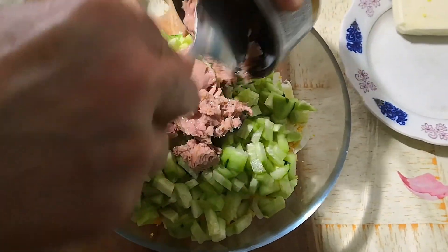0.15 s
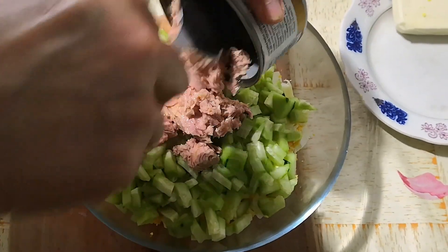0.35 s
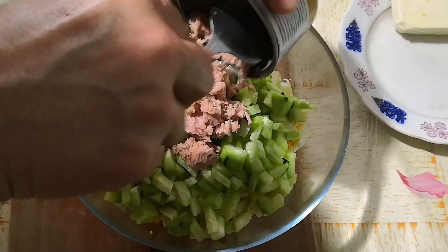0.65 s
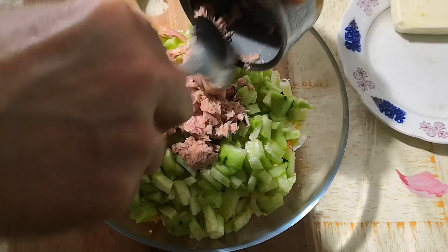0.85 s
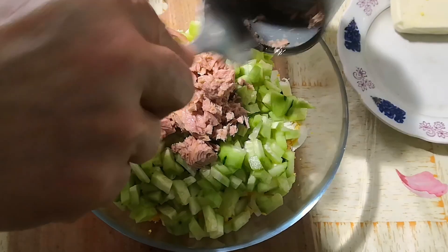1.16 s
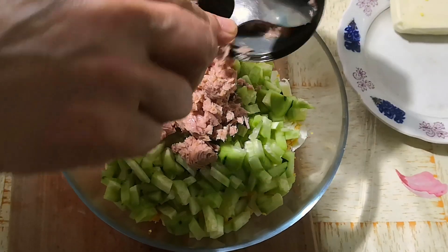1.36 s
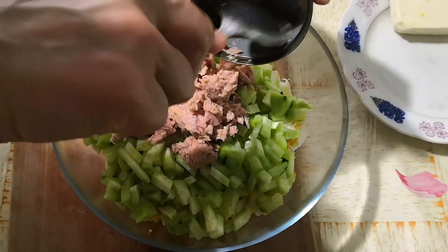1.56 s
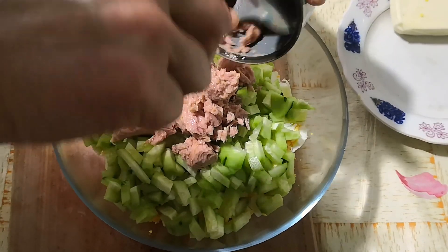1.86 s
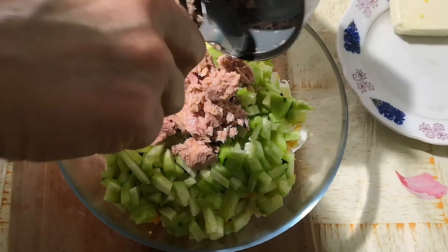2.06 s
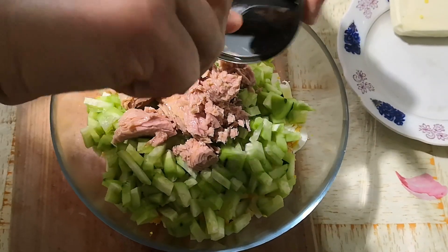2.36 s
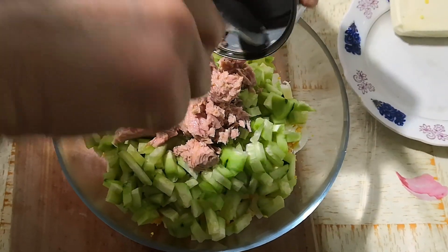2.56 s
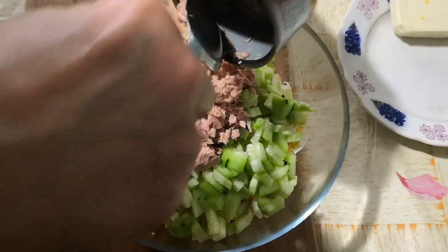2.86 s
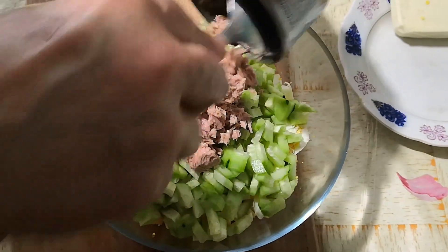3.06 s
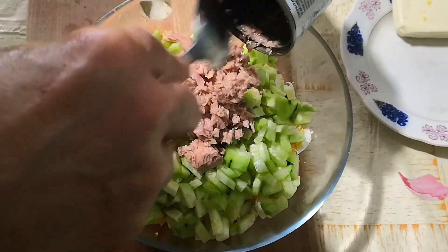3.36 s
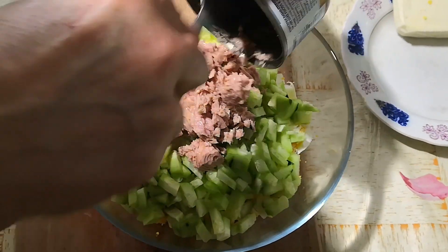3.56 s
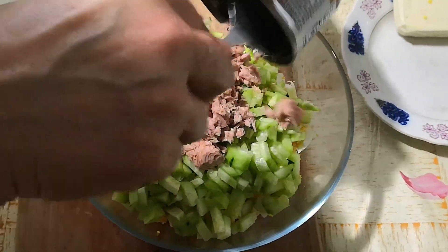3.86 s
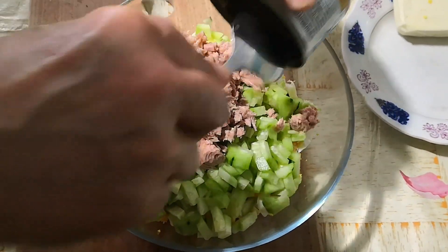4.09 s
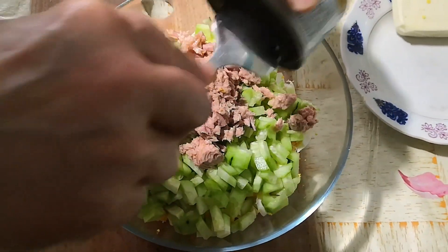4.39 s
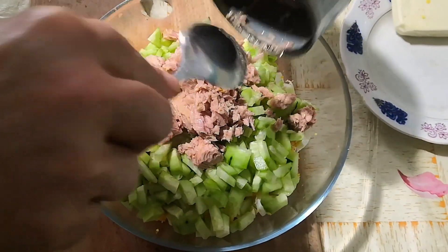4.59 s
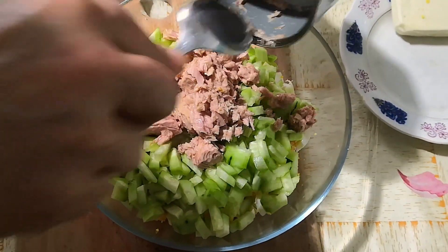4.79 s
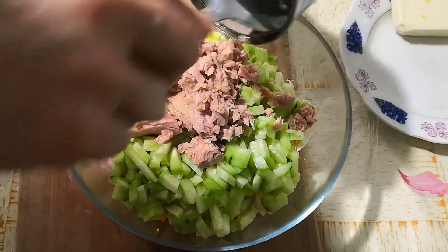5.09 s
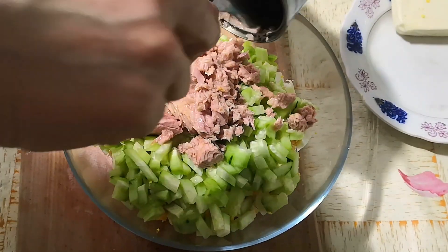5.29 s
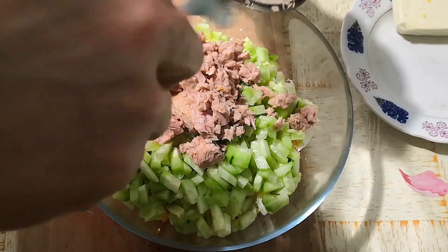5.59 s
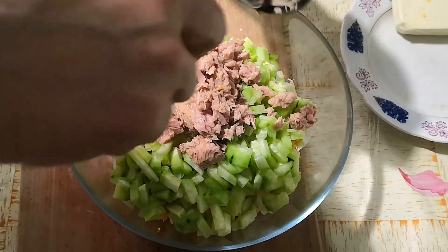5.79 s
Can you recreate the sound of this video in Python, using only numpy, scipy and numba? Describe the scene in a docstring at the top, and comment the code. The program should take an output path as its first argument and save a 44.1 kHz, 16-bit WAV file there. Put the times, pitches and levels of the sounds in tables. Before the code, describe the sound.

Irregular metallic knocks and short rasping scrapes of a spoon emptying a hand-held can, with faint wet ticks of food.

```python
"""A quiet kitchen: a steel spoon scoops moist fish from a hand-held tin can into a glass bowl.
Knocks and the scraping edge ring the same base and wall modes; each contact retunes and damps them.
Wet food hisses under the edge and ticks as it parts from the metal. Lumps and knocks thud in the bowl
and table. A short, dull reverberation and the hush of the room lie behind."""
import sys
import numpy as np
from scipy import signal
from scipy.fft import rfft, irfft, next_fast_len
from scipy.io import wavfile
from numba import njit

SR = 44100
rng = np.random.default_rng(int(sys.argv[2]) if len(sys.argv) > 2 else 0)


def log_audio(samples):
    """Write samples as a 16-bit WAV file to the path given in sys.argv[1]."""
    # one column per channel
    frames = np.atleast_2d(samples).T
    # limit to full scale, then quantise
    limited = np.clip(frames, -1, 1)
    pcm = np.round(limited * 32767).astype(np.int16)
    wavfile.write(sys.argv[1], SR, pcm)


N = 261763

# Upper edges in Hz of the base, low wall, high wall and rim bands; the top band lies above.
BAND_EDGES_HZ = [550, 2000, 4000, 8500]
# Each row: start in seconds, force in dB, gains in dB of base, low wall, high wall and rim,
# low and high patch pitch in Hz, ring time factor, bowl jolt in dB.
KNOCKS = [(0.282, -12, -27, -6, -19.5, -18, 1012, 2360, 1, -50),
          (0.296, -17, -25, -20, -12, -11, 1114, 2670, 0.18, -62),
          (0.322, -12.5, -26.5, -9.5, -13, -10, 1143, 2520, 0.52, -47),
          (0.618, -8, -35, -22, -15, -10.5, 1138, 3566, 1, -65),
          (0.622, -11.5, -33, -12.5, -17, -11, 1260, 2840, 0.29, -59),
          (0.669, -4, -21.5, -10.5, -15, -4, 1230, 2410, 0.63, -47),
          (0.688, -10.5, -19, -34, -8.5, -8.5, 1286, 2780, 0.36, -44),
          (0.833, -28.5, -30, -21, -18.5, -7, 1250, 2890, 0.53, -71),
          (1.027, -4.5, -17, -15.5, -15, -3.5, 978, 2210, 0.43, -41.5),
          (1.407, -6, -38, -16.5, -12, -9.5, 1080, 2900, 0.63, -42.5),
          (1.415, -7, -39, -12, -16.5, -13.5, 1145, 2650, 0.36, -49),
          (1.458, -6, -24, -17.5, -14.5, -26, 1130, 3870, 0.49, -44.5),
          (1.518, -17, -51, -49, -5.5, -33, 1290, 2716, 0.74, -67),
          (1.759, -29.5, -42, -9.5, -11.5, -1, 1240, 2570, 0.19, -61),
          (1.78, -38.5, -31, -27, -5.5, -20, 1790, 3330, 0.68, -73),
          (1.869, -3.5, -39.5, -22.5, -13.5, -8, 1280, 2730, 0.58, -56),
          (1.932, 1, -29, -18, -10.5, -18, 1200, 2216, 0.44, -53),
          (1.985, -14.5, -31.5, -11.5, -10.5, -5.5, 1380, 2600, 0.88, -59),
          (2.185, -51.5, -42, -27, -17, 9.5, 1720, 3960, 0.74, -76.5),
          (2.265, -7, -33.5, -19, -14.5, -4.5, 2020, 2570, 0.56, -48),
          (2.298, -5.5, -22, -9.5, -9.5, -26, 1370, 2400, 0.86, -48),
          (2.331, -14, -16, -17, -11, -13.5, 1250, 2420, 0.74, -61),
          (2.676, -21, -45, -25, -8.5, -4.5, 1291, 3084, 0.67, -73),
          (3.155, -30.5, -9, -3.5, -11, -9.5, 1062, 2500, 0.76, -64.5),
          (3.177, -21.5, -29, -11.5, -7.5, -11.5, 1850, 2330, 0.8, -58),
          (3.193, -14.5, -15.5, -14.5, -11, -45, 1320, 2590, 0.65, -54),
          (3.332, -26, -14, -17, -12.5, -7.5, 1150, 2760, 0.38, -64.5),
          (3.553, -27.5, -7, -11.5, -9.5, -13, 1165, 3230, 0.39, -46.5),
          (3.567, -22, -6, -4, -14, -18.5, 994, 2650, 0.57, -54),
          (3.926, -31, -2, -5, -18.5, -18, 1100, 2670, 0.52, -64),
          (3.989, -16.5, -7, -7, -15.5, -8, 1080, 2710, 0.55, -48.5),
          (4.205, -19, -29.5, -16, -14, -9, 1920, 3204, 0.54, -67),
          (4.272, -15, -8, -9.5, -15, -7, 1090, 2735, 0.44, -48),
          (4.522, -5.5, -19.5, -15, -13.5, -6.5, 1130, 2877, 0.53, -54.5),
          (4.611, -25.5, -24.5, -15.5, -16.5, -5.5, 1180, 3220, 0.4, -72.5),
          (4.808, -14.5, -19.5, -11.5, -15, -3, 1070, 2745, 0.55, -52),
          (5.159, -11.5, -28.5, -28.5, -12, -9, 1830, 2360, 0.7, -50),
          (5.183, -20.5, -13, -6.5, -12.5, -17, 1390, 2420, 0.9, -52),
          (5.409, -19.5, -27.5, -22, -13, -16, 1933, 2600, 1, -69),
          (5.584, -18.5, -15.5, -13.5, -11.5, -7, 1400, 2930, 0.32, -64.5),
          (5.846, -16, -24.5, -12.5, -17, -2.5, 1340, 3660, 0.52, -64),
          (5.905, -14.5, -9.5, -7, -15, -10, 1029, 2900, 0.37, -45.5)]


def spoon_knocks(chatter_s=0.0018):
    """Force of each knock: one sharp contact, then decaying chatter."""
    contact, chatter = np.zeros((2, N + 2000))
    decay = np.exp(-np.arange(2000) / SR / chatter_s)
    for start_s, db, *_ in KNOCKS:
        start = round(start_s * SR)
        burst = rng.standard_normal(2000) * decay
        contact[start] = from_db(db)
        chatter[start:start + 2000] += from_db(db) * burst / np.linalg.norm(burst)
    return contact[:N], chatter[:N]


# One curve per stretch of scraping; a long scrape runs on through two curves. Each row: time in seconds,
# rasp in dB, wall emphasis in dB (high when the spoon leans in slowly, low when it skates).
SCRAPES = [
    [(0.284, -45.5, 20), (0.306, -31.5, 3.7), (0.316, -41.5, 14), (0.338, -35, 3.4), (0.364, -61, 22.6),
     (0.414, -70.5, 4.9), (0.45, -66.5, 1)],
    [(0.62, -26, 9), (0.65, -43, -17), (0.658, -70, -2), (0.668, -27, 14), (0.722, -51, 22),
     (0.812, -61.5, 16), (0.84, -54, 1)],
    [(0.85, -73.5, -4), (0.884, -87.5, 6.5), (0.9, -58.5, 6), (0.914, -92, 8), (0.936, -65.5, 5.5),
     (1.016, -63, 26.5), (1.024, -35, 11)],
    [(1.028, -22, 1), (1.042, -28, 6), (1.052, -54, 22), (1.07, -43.5, 12), (1.122, -36.5, -4),
     (1.136, -57.5, 8.5), (1.27, -85.5, 22.5)],
    [(1.409, -21.5, -1), (1.427, -37.5, 5), (1.451, -31.5, -9), (1.457, -27.5, 22), (1.491, -55, 11),
     (1.517, -26.5, 6.5), (1.58, -75.5, 30)],
    [(1.58, -64, 22), (1.618, -36.5, 7.4), (1.634, -34.5, 7.6), (1.754, -54.5, 6.8), (1.758, -51.5, 3.9),
     (1.834, -69, 21), (1.86, -65.5, 19.4)],
    [(1.87, -30, -2), (1.888, -45, 21), (1.916, -36, -20), (1.928, -31.5, 9), (2.038, -48, 14.5),
     (2.11, -38, -10.5), (2.2, -107.5, -2)],
    [(2.266, -31, 1), (2.28, -34, -5), (2.304, -30.5, 15), (2.32, -43.5, 18), (2.332, -35, 18),
     (2.348, -54, 16), (2.42, -59.5, 15)],
    [(2.42, -57, 13.5), (2.508, -45.5, 11.5), (2.616, -47, 10.5), (2.652, -35, 6), (2.738, -43.5, 6),
     (2.756, -63.5, 10), (2.9, -75, -3.5)],
    [(3.14, -72.5, 6), (3.18, -32, 8.5), (3.27, -58, 13.5), (3.324, -59, 6), (3.334, -50.5, 7.5),
     (3.356, -67.5, -2), (3.54, -63.5, 1.5)],
    [(3.554, -39.5, -2.5), (3.574, -54, 6), (3.604, -58.5, 15), (3.664, -36.5, -5), (3.696, -68.5, -6.5),
     (3.882, -84, -1.5), (3.9, -85, 8)],
    [(3.926, -65.5, 20), (3.936, -57, 18), (3.972, -41, 2), (3.994, -41.5, 11), (4.02, -46, 7),
     (4.196, -57.5, 9.5), (4.2, -67, 3)],
    [(4.206, -30, 4.5), (4.224, -50, 14), (4.238, -48, 10), (4.26, -37, -6), (4.276, -39, 0),
     (4.284, -46, 11.5), (4.42, -89, 15.5)],
    [(4.523, -23.5, 9), (4.527, -31.5, 3.5), (4.537, -44.5, 14.5), (4.599, -59.5, 20.5), (4.611, -42.5, -8),
     (4.627, -65.5, 16.5), (4.72, -93.5, 12.5)],
    [(4.809, -26.5, -2), (4.813, -36, -6.5), (4.825, -51, 14.5), (4.877, -33, 8.5), (4.885, -30, -6.5),
     (4.913, -63.5, 6), (5.0, -84, 7)],
    [(5.16, -24.5, 0), (5.234, -62, 17), (5.268, -63.5, 11), (5.284, -43, 4.5), (5.308, -38.5, 4),
     (5.362, -57.5, 10.5), (5.37, -50, 11)],
    [(5.37, -51.5, 2.5), (5.416, -32, 1), (5.48, -63.5, 10), (5.574, -33.5, -10), (5.584, -39, 5),
     (5.692, -95, 24), (5.72, -97, 15)],
    [(5.847, -24.5, -1), (5.851, -36.5, 1.5), (5.865, -54, 13), (5.897, -37, 0), (5.907, -34.5, -10),
     (5.915, -36.5, -14), (5.935, -63, 30)],
]
# Per band: offset from the rasp in dB; share of the wall emphasis.
RASP_DB = [-15, -6.5, -1, 7, -3.5]
WALL_SHARE = [0.73, 0.99, 0.41, -0.34, -0.47]
# Per curve: top band gain in dB, the hiss of moist food.
WET_DB = [-3, 0, 0, -0.5, -3.5, -0.5, -0.5, -1.5, -1, 6, 2, 10.5, 2, 0, -1.5, 1, -5.5, -3]


def spoon_drag():
    """Gain with which the dragged edge drives each band."""
    drive_db, t = np.full((5, N), -120.), np.arange(N) / SR
    for curve, wet_db in zip(SCRAPES, WET_DB):
        times, rasp_db, wall_db = np.transpose(curve)
        on = (t >= times[0]) & (t <= times[-1])
        for band in range(5):
            curve_db = rasp_db + RASP_DB[band] + WALL_SHARE[band] * wall_db
            drive_db[band, on] = np.interp(t[on], times, curve_db)
        drive_db[-1, on] += wet_db
    return from_db(drive_db)


# Clear modes of the can. Each row: pitch in Hz, relative level in dB, T60 in seconds.
CLEAR_MODES = [(382, 0, .26), (711, -16, .25), (800, -14, .2), (940, -4, .1), (1040, -5, .1),
               (1135, -2, .12), (1195, 0, .14), (1270, -2, .1), (1390, -3, .15), (1590, -6, .12),
               (1740, -7, .12), (1825, -4, .15), (1927, -7, .2), (2200, -3, .1), (2450, 0, .14),
               (2640, -1, .14), (2800, -2, .1), (2900, -2, .1), (3030, -3, .08), (3255, -4, .09),
               (3540, -8, .1), (3860, -6, .08), (4270, -2, .09), (4800, -2, .07), (5240, -4, .07),
               (5600, -4, .035), (5760, -4, .05), (6600, -4, .05), (7240, -5, .045)]
# Spectrum of the crowded, damped modes of can and spoon. Each row: frequency in Hz, relative level in dB.
CROWD_SPECTRUM = [(250, -15), (450, -16), (600, -35), (900, -20.5), (2000, -10.5), (4000, 3), (7000, 15),
                  (8500, -2), (10500, -4.5), (13000, -13.5), (15500, -19.5)]


def can_modes(contact, chatter, drag, grit, latest, linger):
    """Whole-can ringing by band; clear modes near the pitches of the touched patch are favoured."""
    crowd_hz = np.geomspace(250, 15500, 52) * np.exp(rng.normal(0, 0.029, 52))
    crowd_t60 = np.minimum(75 / crowd_hz, 0.04)   # 75 cycles, 40 ms at most
    crowd = np.transpose([crowd_hz, at_hz(CROWD_SPECTRUM, crowd_hz), crowd_t60])
    modes = np.vstack([CLEAR_MODES, crowd])
    bands = np.searchsorted(BAND_EDGES_HZ, modes[:, 0])
    share = from_db(modes[:, 1])
    share /= np.sqrt(np.bincount(bands, share ** 2))[bands]   # unit power per band
    knocks = np.transpose(KNOCKS)
    start_s, patch_hz, ring = knocks[0], knocks[6:8], knocks[8]
    strike_db = np.vstack([knocks[2:6], knocks[5] - 20.5]) - 0.5   # the top band follows the rim
    out = np.zeros((5, 2, N))
    for k, (hz, _, t60) in enumerate(modes):
        band, clear = bands[k], k < len(CLEAR_MODES)
        spot_db = rng.normal(0, 3, len(KNOCKS))
        tuned_hz = hz * np.exp(rng.normal(0, 0.0065 if clear else 0.034, len(KNOCKS)))
        blow = (0.36 * (-1) ** k * contact + chatter) * from_db(spot_db)[latest]
        if k == 0:   # the base booms higher as the can empties
            tuned_hz, blow = 364.4 + 5 * start_s, 1.76 * contact
        struck = blow * from_db(strike_db[band])[latest]
        nearness = np.exp(-(np.log(hz / patch_hz) / 0.069) ** 2).sum(axis=0)
        favour_db = 9 * np.minimum(nearness, 1) * clear + spot_db
        rub_gain = from_db(favour_db[latest] * linger - 11) * flicker(8.3, db=4.5)
        rubbed = rub_gain * noise_gain(t60 * ring)[latest] * drag[band] * grit[k % 3]
        resonate(out[band], share[k] * (struck + rubbed), *mode(tuned_hz, t60 * ring), latest)
    return out


def wall_patch(contact, chatter, drag, grit, latest, linger):
    """The wall under the spoon rings at two pitches set by where it touches."""
    knocks = np.transpose(KNOCKS)
    wall_db, patch_hz, t60 = knocks[3:5], knocks[6:8], 0.058 * knocks[8]
    out = np.zeros((5, 2, N))
    for k, band in enumerate((1, 2)):
        struck = from_db(wall_db[k] + 3.5)[latest] * (contact + 0.1 * chatter)
        rubbed = from_db(-10.5) * linger * noise_gain(t60)[latest] * drag[band] * grit[k]
        resonate(out[band], struck + rubbed, *mode(patch_hz[k], t60), latest)
    return out


# Each row: start and end in seconds, pitch in Hz, gain on the low wall scraping in dB, T60 in seconds.
SINGING_MODES = [(.284, .3, 943, 3.0, .04), (.285, 0.42, 2647, -3.5, .03), (1.17, 1.29, 2060, 0, 0.035),
                 (1.553, 1.868, 1718, 0, 0.025), (1.582, 1.702, 4990, -10.5, 0.037),
                 (1.895, 1.93, 5550, 2, 0.025), (2.067, 2.12, 5570, 2.5, 0.028),
                 (2.342, 2.633, 1736, -14.5, .1), (2.444, 2.605, 5540, -11.5, 0.032),
                 (4.272, 4.311, 714, -13.5, 0.27), (4.524, 4.545, 1193, -6.5, 0.36),
                 (4.524, 4.55, 710, -14, 0.4), (4.528, 4.59, 3290, -13.5, 0.096),
                 (4.81, 4.853, 717, -6, 0.31), (5.17, 5.386, 1850, 0.2, 0.094),
                 (5.178, 5.436, 2517, -1, 0.061), (5.169, 5.701, 1396, -2.5, 0.094),
                 (5.17, 5.3, 711, -13.5, 0.26), (5.274, 5.347, 4260, -5.5, 0.075),
                 (5.392, 5.74, 1874, -5, .12)]


def singing_tones(friction):
    """Single modes sing out under the scraping edge: modes of the can wall, and near 5.5 kHz the spoon's bowl."""
    out, one_tuning = np.zeros((5, 2, N)), np.zeros(N, int)
    for start_s, end_s, hz, db, t60 in SINGING_MODES:
        gate = np.zeros(N)
        gate[round(start_s * SR):round(end_s * SR)] = from_db(db) * noise_gain(t60)
        band = np.searchsorted(BAND_EDGES_HZ, hz)
        resonate(out[band], gate * friction, *mode(np.array([hz]), t60), one_tuning)
    return out


def tin_can(linger_s=0.09, radiate_hz=303.5, dip_hz=574, dip_width_hz=907):
    """Struck and scraped can: too small to radiate bass; the level dips near 570 Hz."""
    knock_s, samples = np.transpose(KNOCKS)[0], np.arange(N)
    knocks_so_far = np.searchsorted(np.round(knock_s * SR), samples, "right")
    latest = np.maximum(knocks_so_far - 1, 0)
    linger = np.exp(-np.abs(samples / SR - knock_s[latest]) / linger_s)   # spoon slides off the patch
    contact, chatter = spoon_knocks()
    drag = spoon_drag()
    grit = rng.standard_normal((3, N)) * flicker(600, db=2.5) * flicker(90, db=2.5)   # uneven slips
    spoon = contact, chatter, drag, grit, latest, linger
    bands = can_modes(*spoon) + wall_patch(*spoon) + singing_tones(drag[1] * grit[2])
    # heavy low modes follow only the slow part of the force
    slow = [signal.lfilter(*signal.butter(2, 2.4 * hz, fs=SR), band)
            for band, hz in zip(bands, BAND_EDGES_HZ)]
    bass_cut = signal.butter(4, radiate_hz, "high", fs=SR, output="sos")
    radiated = signal.sosfilt(bass_cut, sum(slow) + bands[-1])
    return signal.lfilter(*signal.iirnotch(dip_hz, dip_hz / dip_width_hz, fs=SR), radiated)


# Each row: frequency in Hz, phase lead of the left channel in radians.
LEFT_LEAD = [(0, 0), (340, 1.2), (1030, 0.1), (1460, 2.7), (1810, 1.6), (2500, 0.4), (3010, 0.1),
             (3270, 0.7), (4740, -0.0), (5000, 0.1), (7320, -0.1), (9300, -0.0), (15100, -0.0),
             (16100, -0.4)]
# Each row: frequency in Hz, left minus right in dB.
CAN_BALANCE = [(60, -11.0), (150, -10.5), (380, -3.0), (950, -2.5), (2380, 0.0), (5980, 0.5), (15000, 0.0)]


def mode(hz, t60):
    """Pole and complex stereo gains for each tuning; modes heard out of phase are the strong ones."""
    angle = 0.5 * (at_hz(LEFT_LEAD, hz) + rng.normal(0, 0.4, len(hz)))
    strength = 1 / np.maximum(np.abs(np.cos(angle)), 0.55)
    gains = strength * pan(at_hz(CAN_BALANCE, hz)) * np.exp([1j * angle, -1j * angle])
    poles = from_db(-60 / (t60 * SR)) * np.exp(2j * np.pi * hz / SR)
    return poles, gains


@njit
def resonate(out, force, poles, gains, tuning):
    """Add a one-pole resonator to out; tuning picks its pole and gains at each sample."""
    state = 0j
    for i in range(len(force)):
        state = state * poles[tuning[i]] + force[i] + 1e-18
        out[0, i] += (state * gains[0, tuning[i]]).imag
        out[1, i] += (state * gains[1, tuning[i]]).imag


# Each row: start in seconds, peak in dB, pitch in Hz.
FOOD_TICKS = [(0.0206, -51, 7600), (0.03, -47, 7260), (0.0514, -46, 7160), (0.0792, -51, 8970),
              (0.101, -47.5, 5770), (0.1187, -51, 8630), (0.1277, -43, 6900), (0.167, -48.5, 9500),
              (0.4946, -54.5, 5220), (0.5116, -55.5, 8590), (0.55, -62.5, 5100), (0.8977, -46, 6320),
              (0.9403, -46.5, 7880), (1.18, -50, 4520), (1.7803, -35.5, 7410), (2.1535, -42, 5570),
              (2.779, -50, 7600), (2.9444, -54.5, 7500), (2.986, -57, 6600), (3.0312, -55, 6800),
              (3.1456, -42.5, 5760)]


def food_ticks(faint_count=60, decay_s=0.0023):
    """Wet food parts from metal in tiny puffs of band noise; fainter ones come at random."""
    out = np.zeros((2, N))
    decay = np.exp(-np.arange(400) / SR / decay_s)
    faint = [(rng.uniform(0, N / SR - 0.02), rng.normal(-66, 5.8), 7000 * rng.lognormal(0, 0.32))
             for _ in range(faint_count)]
    for start_s, db, hz in list(FOOD_TICKS) + faint:
        band = signal.butter(2, [hz / 1.35, min(hz * 1.34, 0.45 * SR)], "band", fs=SR)
        puff = signal.lfilter(*band, rng.standard_normal(400) * decay)
        puff *= from_db(db) / np.abs(puff).max()
        start = round(start_s * SR)
        out[:, start:start + 400] += puff * pan(rng.normal(1.5, 2.5))[:, None]
    return out


# Each row: start in seconds, bowl level in dB, table level relative to the bowl in dB.
LUMPS = [(1.632, -50, -23), (3.0, -79.5, 7), (3.231, -41.5, -15.5), (3.269, -45.5, -7.5)]


def bowl_thuds(bowl_hz=156, table_hz=65.6, t60_s=0.053):
    """Dropping lumps and knocks shake the bowl and, more deeply, the table."""
    out = np.zeros(N + SR)
    jolts = [(start_s, db, -18.5) for start_s, *_, db in KNOCKS]
    for start_s, db, table_db in list(LUMPS) + jolts:
        shake = rumble(bowl_hz, t60_s) + from_db(table_db) * rumble(table_hz, 1.5 * t60_s)
        start = round(start_s * SR)
        out[start:start + len(shake)] += from_db(db) * shake
    return out[:N] * pan(-19.5)[:, None]


def rumble(hz, t60):
    """Decaying noise around a low pitch, peak 1."""
    band = signal.butter(2, [hz / 1.3, hz * 1.5], "band", fs=SR, output="sos")
    decay = from_db(-60 * np.arange(14000) / SR / t60)
    burst = signal.sosfilt(band, rng.standard_normal(14000) * decay)
    return burst / np.abs(burst).max()


def kitchen_reverb(sound, t60_s=0.27, wall_cut_hz=1100):
    """Wall echoes: six feedback delays a side, duller on every round."""
    size = next_fast_len(N + SR)
    hz = np.arange(size // 2 + 1) * SR / size
    dull = 1 / np.sqrt(1 + (hz / wall_cut_hz) ** 2)
    response = np.zeros((2, len(hz)), complex)
    for k, lag_s in enumerate(rng.uniform(0.02, 0.03, 12)):
        feedback = from_db(-60 * lag_s / t60_s) * dull ** (lag_s / 0.11)
        loop = feedback * np.exp(-2j * np.pi * hz * lag_s)
        response[k % 2] += loop / (1 - loop) * (-1) ** (k // 2)
    return irfft(response * rfft(sound, size), size)[:, :N]


# Each row: frequency in Hz, relative noise density in dB.
HUSH_SPECTRUM = [(12, -29), (20, -1.5), (49, -7.5), (150, 0.5), (574, -13.5), (1480, -15), (1860, -9),
                 (4540, -20.5), (7110, -21.5), (14300, -23.5), (16000, -47)]
# Each row: frequency in Hz, left minus right in dB.
HUSH_BALANCE = [(60, -18.5), (240, -3.5), (950, 1.5), (3770, 1), (15000, 0.5)]


def hush(rms_db=-69):
    """Kitchen air and microphone noise in half-octave bands, independent left and right."""
    out, edges = 0, 20 * 2 ** np.arange(0, 9.8, 0.5)
    white = rng.standard_normal((2, 2, N))
    for k, (low, high) in enumerate(zip(edges, edges[1:])):
        band = signal.sosfilt(signal.butter(2, [low, high], "band", fs=SR, output="sos"), white[k % 2])
        hz = np.sqrt(low * high)
        gain = from_db(at_hz(HUSH_SPECTRUM, hz)) * flicker(6, db=2)
        out = out + gain * band * pan(at_hz(HUSH_BALANCE, hz))[:, None]
    return from_db(rms_db) * out / np.sqrt(np.mean(out.mean(axis=0) ** 2))


def from_db(db):
    """Gain of a level in dB."""
    return 10 ** (np.asarray(db) / 20)


def at_hz(points, hz):
    """Interpolate on a log-frequency axis."""
    freqs, values = np.transpose(points)
    return np.interp(np.log(hz), np.log(np.maximum(freqs, 1)), values)


def pan(db):
    """Stereo gains for left minus right in dB."""
    return from_db([db / 2, -db / 2])


def noise_gain(t60):
    """Gain at which unit-rms noise rings a mode at unit rms."""
    return np.sqrt(2 * (1 - from_db(-120 / (t60 * SR))))


def flicker(rate_hz, db):
    """Randomly wandering gain with a spread of db."""
    steps = np.arange(N) * rate_hz / SR
    count = int(steps[-1]) + 2
    return np.interp(steps, np.arange(count), from_db(db * rng.standard_normal(count)))


def scene():
    """Can, food and bowl close by, the room behind."""
    near = tin_can() + food_ticks()
    return near + from_db(-14.5) * kitchen_reverb(near.mean(axis=0)) + bowl_thuds() + hush()


def record(dry, fade_hz=10250, cutoff_hz=16300):
    """The microphone softens the treble, rounds the peaks and cuts the top steeply."""
    soft = signal.lfilter(*signal.butter(2, fade_hz, fs=SR), dry)
    return signal.sosfilt(signal.cheby2(12, 60, cutoff_hz, fs=SR, output="sos"), np.tanh(soft))


dry = scene()
out = record(dry)
log_audio(out)
```